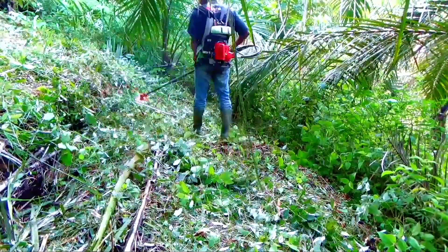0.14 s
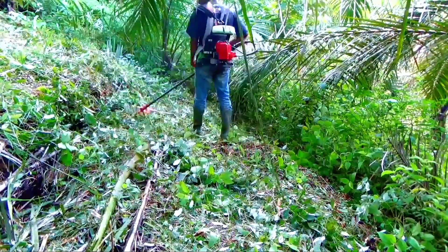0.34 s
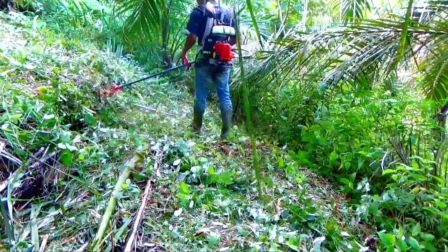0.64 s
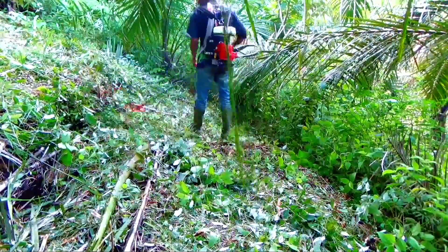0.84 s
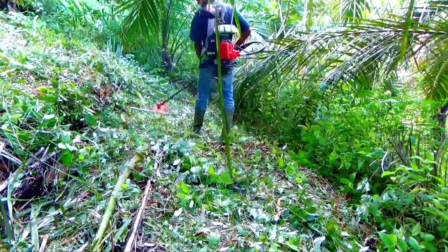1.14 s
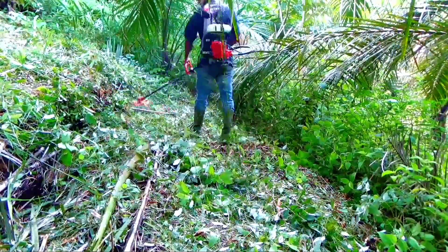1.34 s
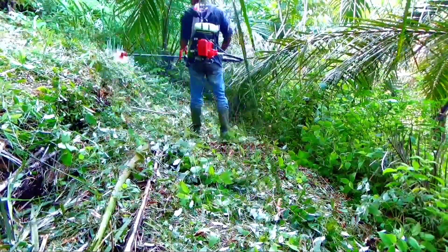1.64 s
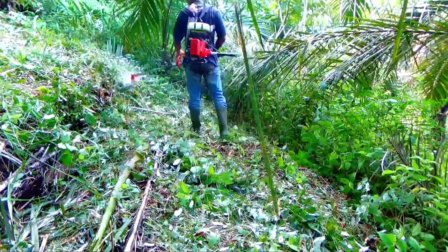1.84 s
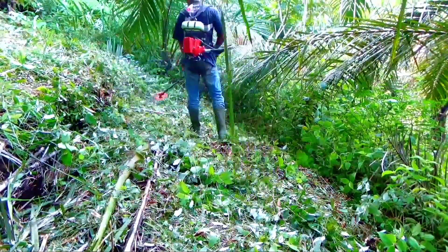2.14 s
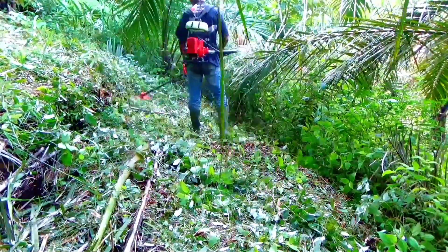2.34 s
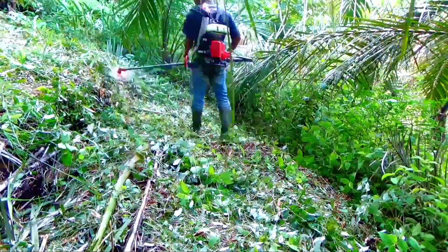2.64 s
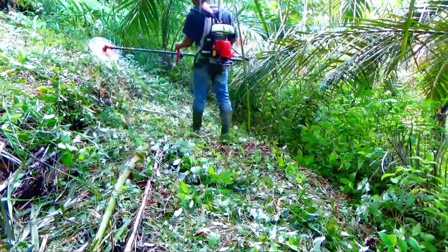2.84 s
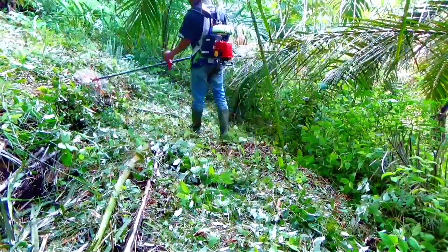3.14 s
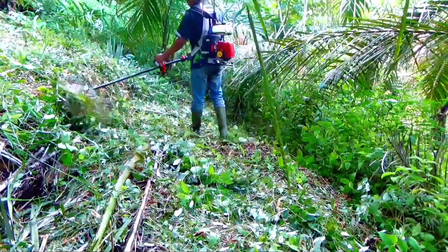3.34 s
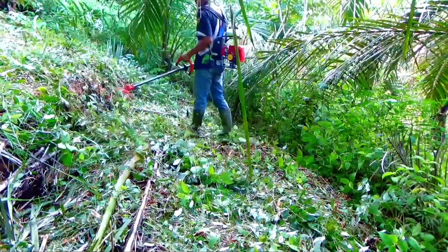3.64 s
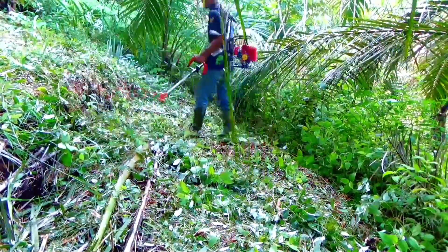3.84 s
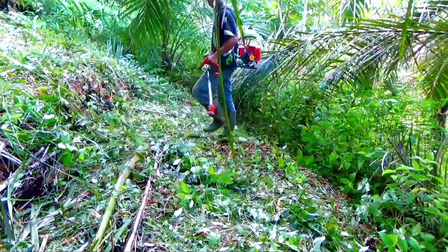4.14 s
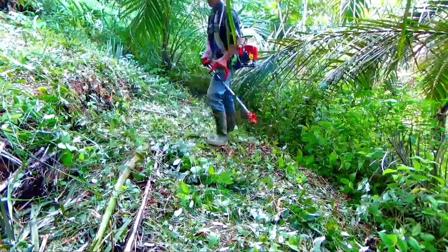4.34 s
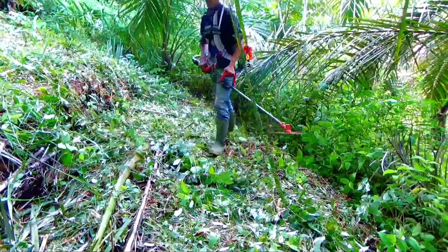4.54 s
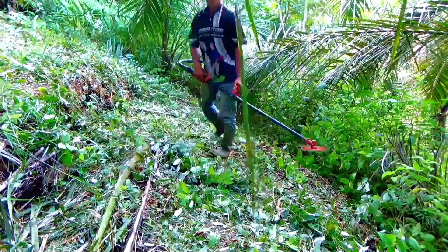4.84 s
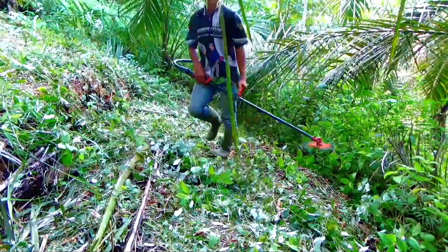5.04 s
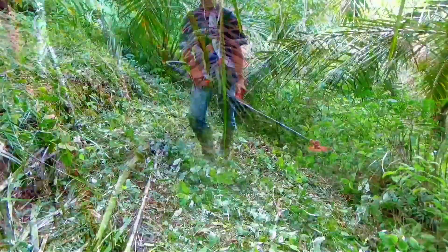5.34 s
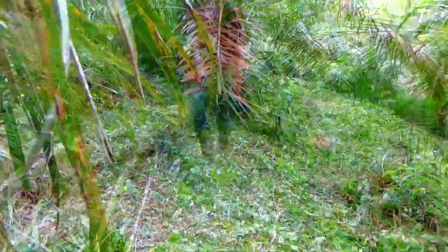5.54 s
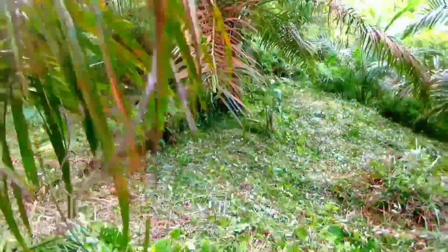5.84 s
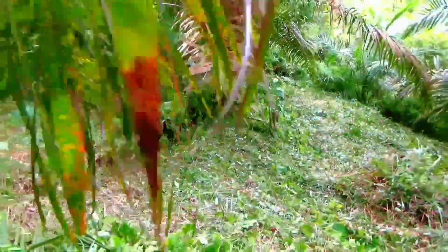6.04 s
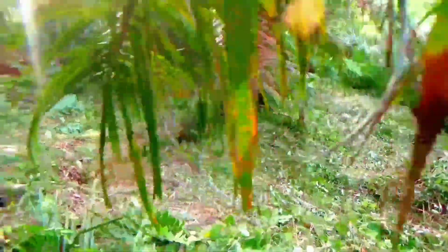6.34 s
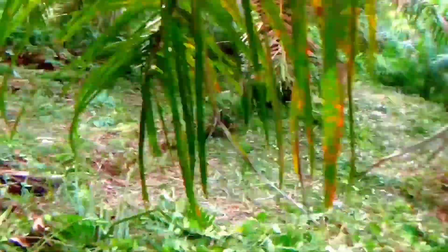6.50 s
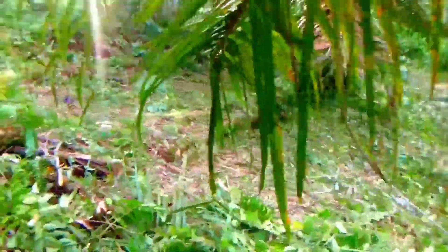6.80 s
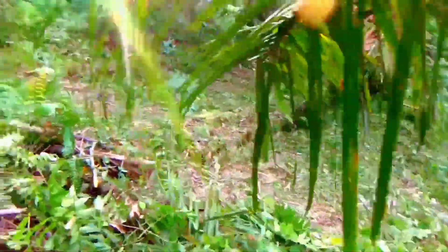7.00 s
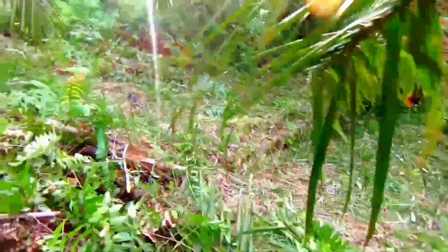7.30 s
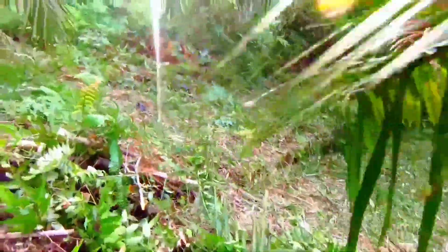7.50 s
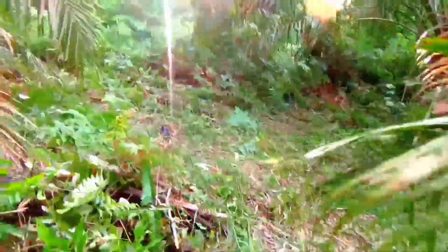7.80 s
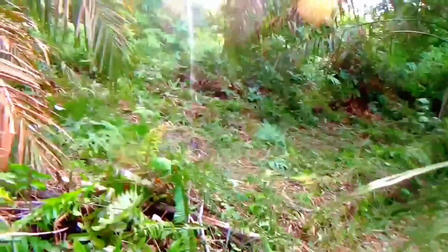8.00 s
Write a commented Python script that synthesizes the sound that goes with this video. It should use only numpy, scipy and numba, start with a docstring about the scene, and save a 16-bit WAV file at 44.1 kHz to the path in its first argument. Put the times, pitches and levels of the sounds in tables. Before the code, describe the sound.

A petrol brush cutter snarls through weeds, sinks to a popping idle and cuts off abruptly, leaving faint insects and rustling steps.

```python
"""A petrol brush cutter snarls at full revs a few metres away, mowing weeds, then sinks to a popping idle.
Each engine cycle rings the muffler; the steel blade hisses in every sweep, and gain control ducks the
engine under it. The machine's sound cuts off abruptly at an edit, leaving insects and a few steps
through palm fronds and dry litter."""
import sys
import numpy as np
from scipy import signal
from scipy.fft import rfft, irfft
from scipy.io import wavfile
from scipy.ndimage import uniform_filter1d, minimum_filter1d, map_coordinates
from numba import njit

SR = 44100
rng = np.random.default_rng(int(sys.argv[2]) if len(sys.argv) > 2 else 0)


def transcribe(u):
    """Save the signal u as a 16-bit wav file named by the first command-line argument.

    u: samples, shape (n,) or (channels, n), limited to [-1, 1]; the rate is SR.
    q: integer samples, one column per channel.
    """
    v = np.clip(np.atleast_2d(u).T, -1, 1)
    q = np.round(v * 32767).astype(np.int16)
    wavfile.write(sys.argv[1], SR, q)


N = 360032
T = np.arange(N) / SR
FREQS = np.maximum(np.arange(N // 2 + 1) * SR / N, 1)
THROTTLE_SHUT_S, SLACK_START_S, EDIT_CUT_S = 3.77, 3.805, 5.83
FULL_HZ, IDLE_HZ = 77, 46  # engine cycles per second
SWAY_HZ, FADE_S = 4, .045


def undb(db):
    """Decibels to gain."""
    return 10 ** (np.asarray(db) / 20)


def unit(x):
    """Scale to an rms of one."""
    return x / np.sqrt(np.mean(x ** 2))


def curve(rows):
    """Join (seconds, value) rows by straight lines."""
    return np.interp(T, *np.transpose(rows))


def ramp(start, length):
    """Fade from zero to one."""
    return np.clip((T - start) / length, 0, 1)


def swells(rows):
    """A bell-shaped envelope for each (centre in seconds, half-width in seconds, dB) row."""
    return sum(undb(db) * np.exp(-2 * np.minimum(((T - s) / width) ** 2, 20)) for s, width, db in rows)


def spectrum(points):
    """Join (Hz, value) points on a log-frequency axis."""
    hz, value = np.transpose(points)
    return np.interp(np.log(FREQS), np.log(hz), value)


def colour(x, points):
    """Minimum-phase EQ through (Hz, dB) points."""
    cepstrum = irfft(np.log(undb(spectrum(points))), N)
    cepstrum[1:N // 2] *= 2
    cepstrum[N // 2 + 1:] = 0
    return irfft(rfft(x) * np.exp(rfft(cepstrum)), N)


def ring(x, modes):
    """Parallel (Hz, width in Hz, dB) resonators, neighbours in opposite polarity."""
    return sum((-1) ** k * undb(db) * signal.lfilter(*signal.iirpeak(hz, hz / width, fs=SR), x + 1e-18)
               for k, (hz, width, db) in enumerate(modes))


def decay(x, seconds):
    """Give each impulse an exponential tail."""
    return signal.lfilter([1], [1, -np.exp(-1 / (seconds * SR))], x + 1e-18)


def noise(side):
    """White stereo noise with the given weight of side to mid."""
    mid, other = rng.standard_normal((2, N))
    return unit(np.array([mid + side * other, mid - side * other]))


def walk(hz):
    """Smooth random modulation with an rms of one."""
    hold = int(SR / hz)
    return unit(uniform_filter1d(np.repeat(rng.standard_normal(N // hold + 1), hold), hold)[:N])


def clicks(times, sizes):
    """Impulses, each shared between two neighbouring samples."""
    out, place = np.zeros(N), np.clip(times * SR, 0, N - 2)
    index = place.astype(int)
    np.add.at(out, index, sizes * (1 - place % 1))
    np.add.at(out, index + 1, sizes * (place % 1))
    return out


def strokes(cycles, scatter_db, jitter_s):
    """One pulse an engine cycle, each with its own strength and timing."""
    times = np.interp(np.arange(1, int(cycles[-1])), cycles, T)
    timing, strength = rng.standard_normal((len(times), 2)).T
    return clicks(times + jitter_s * timing, undb(scatter_db * np.tanh(strength)))


def crank_noise(cycles, memory, side, size=900):
    """Stereo noise tied to the crank angle: each cycle partly repeats the one before."""
    fresh = rng.standard_normal((2, int(cycles[-1]) + 2, size))
    turns = signal.lfilter([1], [1, -memory], fresh, axis=1).reshape(2, -1)
    mid, other = (np.interp(cycles * size, np.arange(len(row)), row) for row in turns)
    return unit(np.array([mid + side * other, mid - side * other]))


def patchy(x, spread_db):
    """Narrow bands swell and fade on their own, as crowded modes do when struck at random."""
    bands = signal.stft(x, nperseg=1024)[2]
    flicker = uniform_filter1d(rng.standard_normal(bands.shape[1:]), 7, axis=1)
    flicker = unit(uniform_filter1d(flicker, 3, axis=0))
    return signal.istft(bands * undb(spread_db * flicker), nperseg=1024)[1][:, :N]


def foliage(x, reverb_s=.09, wet_db=-11):
    """Direct sound plus a faint stereo scatter from the leaves."""
    t = T[:SR // 8]
    tails = rng.standard_normal((2, len(t))) * 1000 ** (-t / reverb_s)
    tails /= np.sqrt(np.sum(tails ** 2, axis=1, keepdims=True))
    return x + undb(wet_db) * signal.fftconvolve(x[None], tails, axes=1)[:, :N]


# Tone of the far vegetation. Each row: frequency in Hz, gain in dB.
FOREST_EQ = [(30, -26), (130, -13), (300, -3.5), (800, 1), (2500, -5.5), (9000, -12)]
# Insect choruses. Each row: pitch in Hz, bandwidth in Hz, level in dB.
INSECT_BANDS = [(4426, 200, -73.5), (6640, 540, -67.5), (7700, 2000, -62.5), (8000, 587, -73)]


def forest():
    """The bed: shimmering insect choruses over the soft wash of far vegetation."""
    bed = undb(-63.5 + 1.2 * walk(21)) * unit(colour(noise(1), FOREST_EQ))
    for hz, width, db in INSECT_BANDS:
        band = [(hz, width, 0)]
        bed += undb(db + walk(30)) * unit(ring(ring(noise(.64), band), band))
    return bed


# Tone of dry leaves and of soil. Each row: frequency in Hz, gain in dB.
LEAF_EQ = [(80, -36), (300, -5.5), (550, 0.5), (1200, 3), (5500, 1.5), (9000, 15.5), (11000, 3)]
SOIL_EQ = [(80, -30), (300, -17), (600, -1.5), (950, 0), (1500, -11), (4000, -24)]
# Brushing fronds and scuffing soles. Each row: centre in seconds, half-width in seconds, level in dB.
FROND_RUSTLES = [(6.69, 0.047, -46), (6.783, 0.029, -45), (7.127, 0.025, -47), (7.28, 0.032, -55),
                 (7.35, 0.04, -48), (7.935, 0.046, -46)]
SOLE_SCUFFS = [(6.68, 0.069, -63), (7.12, 0.019, -59), (7.405, 0.07, -47)]
# Dry twigs breaking. Each row: start in seconds, crack strength in dB, ring of the stick in Hz.
TWIG_SNAPS = [(6.792, -20, 4900), (6.811, -32, 4300), (6.83, -38, 5800), (6.893, -39, 2700),
              (6.917, -39.5, 6000), (7.123, -35, 1450), (7.141, -39, 6000), (7.583, -41, 2300)]


def steps():
    """Fronds crackle past, soles scuff and twigs snap, each twig with its own short woody ring."""
    fronds = swells(FROND_RUSTLES) * unit(colour(noise(.52) * undb(2.1 * walk(900)), LEAF_EQ))
    soles = swells(SOLE_SCUFFS) * unit(colour(noise(.72), SOIL_EQ))
    twigs = 0
    for start, db, hz in TWIG_SNAPS:
        envelope = (T > start) * np.exp(-np.clip((T - start) / .0013, 0, 20))
        crack = undb(db) * envelope * noise(.56)
        twigs += undb(-10) * colour(crack, LEAF_EQ) + ring(crack, [(hz, 900, 0)])
    return fronds + soles + twigs


# The revs, from full throttle down to idle. Each row: time in seconds, engine speed in Hz.
REVS = [(0, 76.78), (.2, 77.66), (.4, 77.28), (0.54, 78.25), (0.66, 77.43), (.87, 78.22), (1.04, 77.45),
        (1.22, 79.36), (1.72, 80.62), (1.89, 80.96), (1.96, 77.13), (2.55, 76.75), (2.82, 77.03),
        (2.92, 78.56), (3.17, 80.03), (3.27, 76.13), (3.74, 76.35), (3.82, 70.51), (4.03, 67.22),
        (4.17, 62.72), (4.5, 51.73), (4.8, 46.3), (5.1, 44.68), (5.5, 46.36)]


def crankshaft(wander=.004):
    """Running count of engine cycles; the speed wanders slightly."""
    return np.cumsum(curve(REVS) * (1 + wander * walk(12))) / SR


def by_speed(full_db, db_per_octave):
    """Gain of a part that quietens as the engine slows."""
    return undb(full_db + db_per_octave * np.log2(curve(REVS) / FULL_HZ))


def above_idle():
    """One while the engine turns fast, zero at idle."""
    return np.clip((curve(REVS) - IDLE_HZ) / 9, 0, 1)


def hum(cycles):
    """A low, wavering hum that fades in midway and lasts until the throttle shuts."""
    gate = ramp(1.8, .35) * (1 - ramp(THROTTLE_SHUT_S, FADE_S))
    return undb(-35 + 2 * walk(SWAY_HZ)) * gate * np.sin(2 * np.pi * 3.5 * cycles)


# Loose metal parts. Each row: pitch in Hz, bandwidth in Hz, level in dB,
# engine speed of the strongest buzz in Hz, reach either side of that speed in Hz.
LOOSE_PARTS = [(1160, 150, -28, 57.5, 6.2), (1713, 15, -26, 60, 5.9), (1714, 16, -26, 50, 2),
               (2708, 40, -27, 59, 6.3)]


def rattles(cycles):
    """As the engine runs down, one loose part after another is struck once a cycle and buzzes."""
    taps = unit(strokes(cycles, scatter_db=7.5, jitter_s=0))
    fizz = unit(np.exp(-2 * (cycles % 1)) * noise(.88))
    buzz = 0
    for hz, width, db, speed_hz, reach_hz in LOOSE_PARTS:
        shake = np.exp(-((curve(REVS) - speed_hz) / reach_hz) ** 2)
        buzz += shake * undb(db) * unit(ring(taps + .5 * fizz, [(hz, width, 0)]))
    return ramp(SLACK_START_S, FADE_S) * buzz


# Hits in the drive. Each row: time in seconds, strength in dB.
DRIVE_HITS = [(0.648, 1.5), (0.747, -2.5), (2.124, 3), (2.185, 5.5), (2.545, -2.5), (2.571, 5), (2.716, 5),
              (3.136, 6.5), (3.547, 2.5), (3.573, 4.5), (5.012, -7.5)]
# Ring of the drive. Each row: frequency in Hz, bandwidth in Hz, gain in dB.
DRIVE_MODES = [(2400, 2000, 0), (4614, 670, 4.5), (8800, 1900, 3.5)]


def knocks():
    """Hard knocks in the drive: each short crack rings the metal."""
    times, db = np.transpose(DRIVE_HITS)
    cracks = decay(clicks(times, undb(db)), seconds=.0047)
    return ring(cracks * noise(.24), DRIVE_MODES)


# Harmonics of the drone. Each row: multiple of the cycle rate, weight coasting in dB, weight idling in dB.
DRONE_HARMONICS = [(2, -19, -22.5), (4, 0.5, 1), (5, -8.5, 4.5), (6, -5.5, -5), (8, 1.5, -7), (10, -5, -14)]


def drone(cycles):
    """Off throttle the piston pumps one uneven throb a cycle."""
    fast = above_idle()
    crank = cycles + .022 * walk(40)
    tone = 0
    for multiple, coast_db, idle_db in DRONE_HARMONICS:
        db = idle_db + fast * (coast_db - idle_db + 2 * walk(6.3))
        tone += undb(db) * np.cos(2 * np.pi * multiple * crank + multiple ** 2)
    throb = undb(1.76 * walk(IDLE_HZ))
    return by_speed(full_db=-25.5, db_per_octave=1.4) * unit(tone * throb)


# Strong firings at idle. Each row: time in seconds, peak in dB.
IDLE_POPS = [(4.972, -9.5), (5.143, -16.5), (5.248, -1.5), (5.35, -1.5), (5.394, -9.5), (5.483, 0.5),
             (5.514, -6), (5.536, -6), (5.595, -10), (5.617, -7.5), (5.669, -7.5), (5.689, -11.5),
             (5.712, -9.5), (5.735, -12), (5.762, -13.5), (5.796, -13.5)]
# Tone of one pop. Each row: frequency in Hz, gain in dB.
POP_EQ = [(60, -33.5), (200, -12), (430, -3), (620, 2.5), (820, -10.5), (1100, -10), (3000, -25.5),
          (10000, -36.5)]


def putter(cycles):
    """Off throttle most charges burn feebly; now and then one catches with a pop."""
    times, db = np.transpose(IDLE_POPS)
    firings = undb(-22) * strokes(cycles, scatter_db=6.5, jitter_s=.00026) + clicks(times, undb(db))
    pop_peak = np.abs(colour(signal.unit_impulse(N), POP_EQ)).max()
    return foliage(colour(firings, POP_EQ) / pop_peak)


# Fader for the valve gear and housing. Each row: time in seconds, level in dB.
CLATTER_FADER = [(0, -17), (.9, -18), (2.2, -20), (2.75, -16), (3.35, -17.5), (3.55, -19), (4.6, -19.5),
                 (5.1, -23), (5.8, -23)]
# Tone of the housing. Each row: frequency in Hz, gain in dB.
HOUSING_EQ = [(25, -27), (60, -15.5), (100, -27), (200, -5), (330, -6.5), (700, 7), (900, -0.5),
              (1600, 0.5), (2300, 4), (3200, 1.5), (4200, -7.5), (6000, -7.5), (11000, -26.5)]


def clatter(cycles, cut, jolts):
    """Valve gear and housing rattle in step with the crank; cutting and pops shake them harder."""
    rattle = patchy(crank_noise(cycles, memory=.55, side=.62), spread_db=3.2)
    unrest = undb(1.2 * walk(45) + 1.5 * walk(700))
    force = np.hypot(undb(curve(CLATTER_FADER)), undb(-11.5) * cut + .5 * jolts)
    return force * unit(colour(rattle * unrest, HOUSING_EQ))


# Hard stems meeting the blade. Each row: start in seconds, starting pitch in Hz, strength in dB.
STEM_PINGS = [(2.739, 3860, -13.5), (2.771, 7580, -16.5), (2.77, 2370, -29.5), (2.891, 2075, -14),
              (3.191, 3090, -9.5)]


def pings(ring_s=.08, sag_per_s=.33):
    """Hard stems set the blade ringing; each ping slides down in pitch as it fades."""
    out = 0
    for start, hz, db in STEM_PINGS:
        age = np.clip(T - start, 0, 2)
        phase = 2 * np.pi * np.cumsum(hz * (1 - sag_per_s * age)) / SR
        envelope = ramp(start, FADE_S) * np.exp(-age / ring_s)
        out += undb(db) * envelope * np.sin(phase + .5 * walk(FULL_HZ))
    return out


# Sweeps through the weeds. Each row: start in seconds, length in seconds, level in dB.
WEED_SWEEPS = [(0.178, 0.37, -12.5), (0.947, 0.27, -7.5), (1.23, 0.23, -5), (1.443, 0.24, -13),
               (1.86, 0.12, 1.5), (1.99, .12, -14), (2.199, 0.21, -5.5), (2.64, 0.63, -17.5),
               (2.72, 0.035, 0), (3.07, 0.28, -11), (3.17, .21, -4), (3.398, 0.048, -6.5), (4.41, 0.6, -19)]
# Bites into stalks. Each row: centre in seconds, half-width in seconds, level in dB.
STALK_BITES = [(.39, 0.0099, -1.5), (.425, 0.074, -3.5), (1.083, 0.018, -2.5), (1.167, 0.017, 3.5),
               (1.335, 0.025, 1), (1.935, 0.027, 5.5), (2.235, .006, 0), (3.076, 0.0056, 0.5),
               (3.352, 0.023, 1)]


def cutting(release_s=.038):
    """Force of the weeds on the blade: each sweep builds, holds and dies away; stalks add short flares."""
    power = swells(STALK_BITES) ** 2
    for start, length, db in WEED_SWEEPS:
        release = np.exp(-np.clip((T - start - length) / release_s, 0, 20))
        power += (undb(db) * ramp(start, FADE_S) * release) ** 2
    return np.sqrt(power)


# Tone of the blade's hiss. Each row: frequency in Hz, gain in dB.
HISS_EQ = [(1000, -34.5), (3000, -10.5), (5500, -9), (7000, -5), (8200, -3.5), (9200, -2), (10000, -2.5),
           (11200, -12)]
# Ring of the steel blade. Each row: frequency in Hz, bandwidth in Hz, relative gain in dB.
STEEL_MODES = [(2965, 18, -2), (3840, 24, -2.5), (7450, 26, -8.5), (8620, 500, -5.5)]


def blade(cycles, cut, jolts):
    """Dense gritty impacts from blade and slack shaft hiss; spinning and cutting set the steel ringing."""
    undriven = undb(-1 * ramp(THROTTLE_SHUT_S, FADE_S))
    spin = by_speed(full_db=-17.5, db_per_octave=5.4) * undriven
    work = np.hypot(spin, cut)
    slack_shaft = by_speed(full_db=-11.5, db_per_octave=9.55) * np.sqrt(ramp(SLACK_START_S, .098))
    force = np.sqrt(work ** 2 + slack_shaft ** 2 + jolts ** 2)
    flutter = unit(undb(1.2 * walk(40) + .71 * walk(220) + 2 * walk(1800)))
    grit = patchy(crank_noise(cycles, memory=.35, side=.55), spread_db=3.5)
    hiss = unit(colour(grit, HISS_EQ))
    steel = unit(sum(ring(noise(.5) * undb(2 * walk(7.7)), [mode]) for mode in STEEL_MODES))
    return force * flutter * hiss + undb(-9.5) * work * steel


# Ring of the exhaust outlet. Each row: frequency in Hz, bandwidth in Hz, relative gain per pass in dB.
OUTLET_MODES = [(2380, 93, -7.5), (4660, 170, 0)]
# Fader for the whistle. Each row: time in seconds, level in dB.
WHISTLE_FADER = [(.3, -22.5), (.65, -27), (1.4, -26), (1.8, -24), (2.55, -21), (2.8, -28), (3, -24),
                 (3.3, -22), (3.5, -18.5), (3.75, -25)]


def whistle(puffs, drift_s=.0012):
    """Each jet of gas whistles in the exhaust outlet, drifting a little in pitch."""
    jet = undb(2 * walk(45)) * puffs * noise(.62)
    tone = unit(ring(ring(jet, OUTLET_MODES), OUTLET_MODES))
    playhead = (T + drift_s * walk(SWAY_HZ)) * SR
    drifting = np.array([map_coordinates(side, [playhead], mode="mirror") for side in tone])
    return undb(curve(WHISTLE_FADER)) * drifting


# Voice of the muffler. Each row: frequency in Hz, bandwidth in Hz, gain in dB, change side-on in dB.
MUFFLER_MODES = [(246.2, 44, -20, 2), (460, 52, 1.5, -0.5), (545, 56, 0.5, -5.5), (615, 91, -1, -6),
                 (700, 80, -3.5, -4), (1008, 62, 1.5, -2.5), (1102, 110, -1, -3), (1238, 65, -1.5, -1),
                 (1700, 90, -14, 2), (2025, 40, -1.5, -7), (2480, 260, -8.5, -4), (2950, 400, -12, -2)]


def muffler(x, turned, sway_db=2):
    """Each resonance wavers as the machine sways on the operator's back, and changes as it turns away."""
    out = 0
    for k, (hz, width, db, turn_db) in enumerate(MUFFLER_MODES):
        gain = undb(turn_db * turned + sway_db * walk(SWAY_HZ))
        out += (-1) ** k * gain * ring(x, [(hz, width, db)])
    return out


def exhaust(cycles, cut, turned, echo_s=.004056):
    """Firings ring the muffler, each with a puff of gas. Off throttle they go on weakly until idle."""
    stumble = (.005 + .02 * cut) * walk(35)  # more uneven under load
    firings = strokes(cycles + stumble, scatter_db=2.5, jitter_s=.00003)
    firings += .36 * np.interp(T - echo_s, T, firings)  # bounce off the ground
    puffs = unit(decay(firings, seconds=.004))
    tone = unit(foliage(muffler(firings, turned)))
    gas = undb(-10) * unit(muffler(puffs * noise(1), turned))
    throttle = np.clip((THROTTLE_SHUT_S - T) / .015, 0, 1)
    force = throttle * undb(-17) + (1 - throttle) * above_idle() * undb(-26.5)
    return force * (tone + gas) + throttle * whistle(puffs)


# The machine's stereo image. Each row: frequency in Hz, phase lead of the left channel in radians.
STEREO_PHASE = [(430, -0.68), (1030, -1.17), (6100, -0.76), (11000, 0.19)]


def place(x, turned, pan_db=-.9):
    """The machine reaches the left side a little later, and edges right as the operator turns."""
    sides = np.array([[.5], [-.5]])
    shifted = irfft(rfft(x) * np.exp(1j * sides * spectrum(STEREO_PHASE)), N)
    return shifted * undb(sides * pan_db * turned)


def scene():
    """The machine, on one crankshaft, until an edit cuts its sound off; then steps; forest throughout."""
    cycles, cut = crankshaft(), cutting()
    turned = ramp(3.1, .35)  # the operator turns side-on
    jolts = swells([(s, .017, db - 12.5) for s, db in IDLE_POPS])  # each pop jerks shaft and housing
    machine = exhaust(cycles, cut, turned)
    machine += ramp(THROTTLE_SHUT_S, .057) * (drone(cycles) + putter(cycles))
    machine += clatter(cycles, cut, jolts) + rattles(cycles) + hum(cycles)
    machine += blade(cycles, cut, jolts) + knocks() + pings()
    before_cut = np.clip((EDIT_CUT_S - T) / .004, 0, 1)
    return before_cut * place(machine, turned) + steps() + forest()


@njit
def follow(x, attack_s, release_s):
    """Envelope that rises and falls at different rates."""
    out, level = np.empty(len(x)), 0.
    for i in range(len(x)):
        level += (x[i] - level) / (SR * (attack_s if x[i] > level else release_s))
        out[i] = level
    return out


def record(dry):
    """Gain control ducks the loud moments, a fast limiter catches the peaks, and the top is cut."""
    threshold_db, ratio, ceiling, top_hz = -10, 3.5, .9, 11150
    loudness = np.sqrt(np.abs(uniform_filter1d(np.mean(dry ** 2, axis=0), size=220)))
    held = follow(loudness, attack_s=.004, release_s=.017)
    ducked = dry * np.maximum(held / undb(threshold_db), 1) ** (1 / ratio - 1)
    limiter = ceiling / np.maximum(np.abs(ducked).max(axis=0), ceiling)
    limiter = uniform_filter1d(minimum_filter1d(limiter, size=41), size=41)
    lowpass = signal.ellip(12, .2, 70, top_hz, fs=SR, output="sos")
    return signal.sosfilt(lowpass, limiter * ducked)


dry = scene()
out = record(dry)
transcribe(out)
```